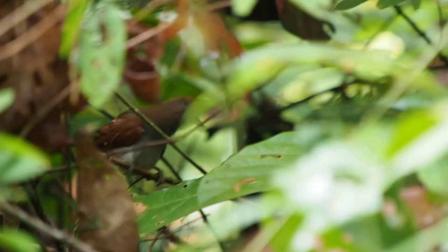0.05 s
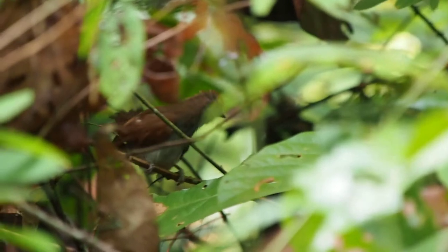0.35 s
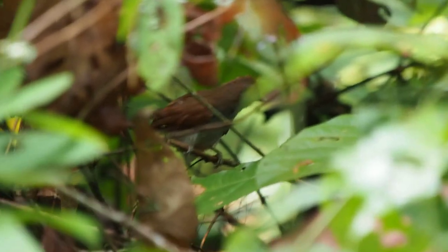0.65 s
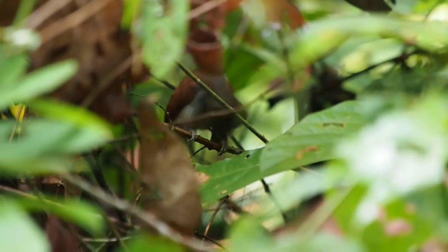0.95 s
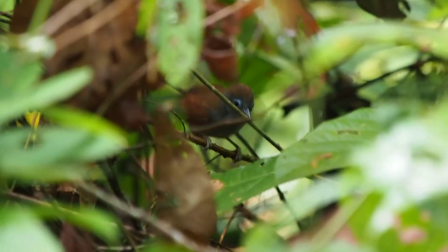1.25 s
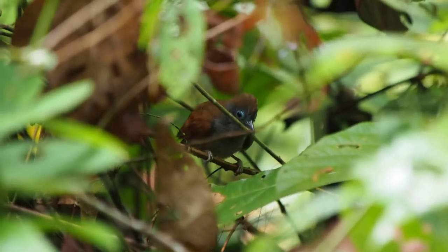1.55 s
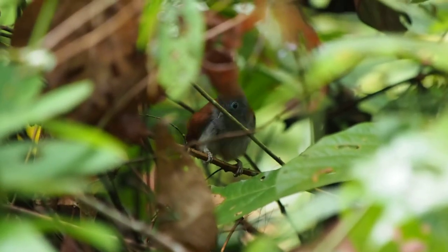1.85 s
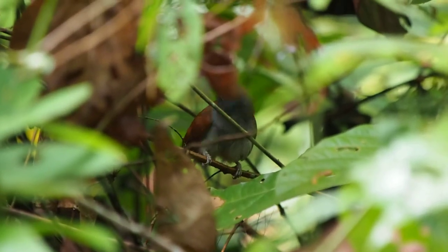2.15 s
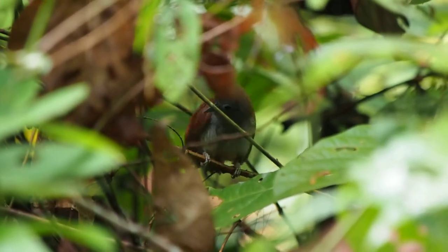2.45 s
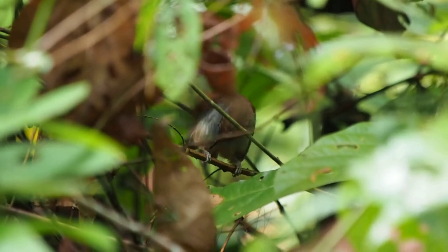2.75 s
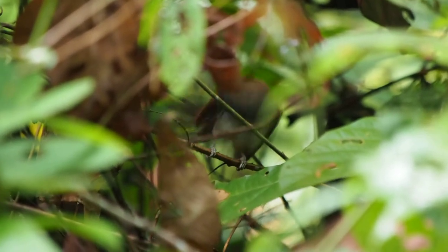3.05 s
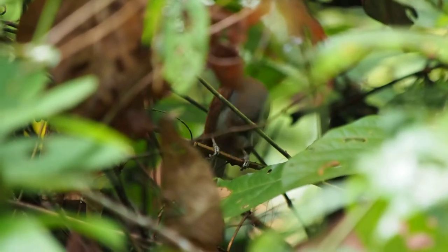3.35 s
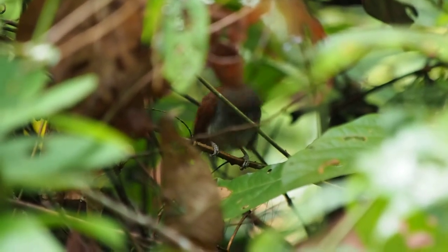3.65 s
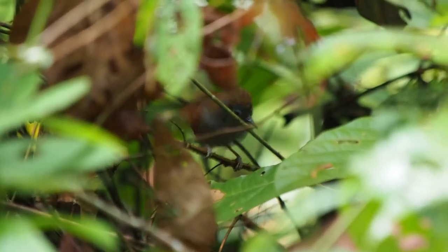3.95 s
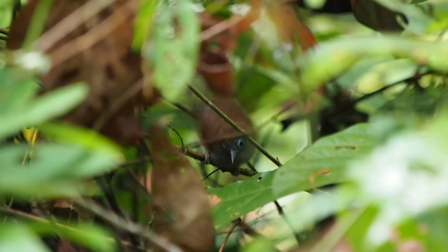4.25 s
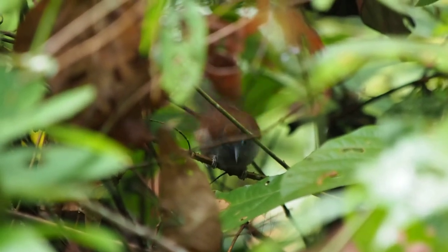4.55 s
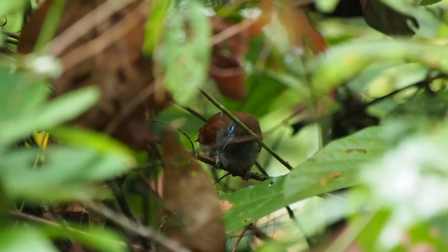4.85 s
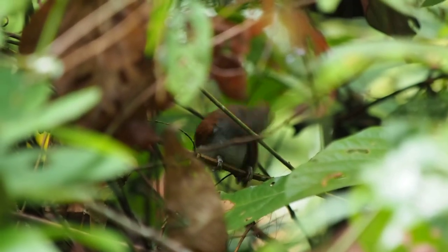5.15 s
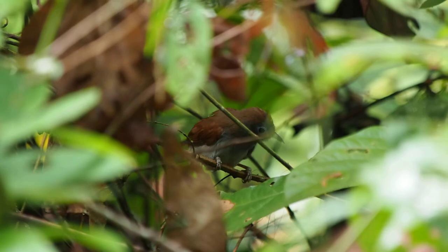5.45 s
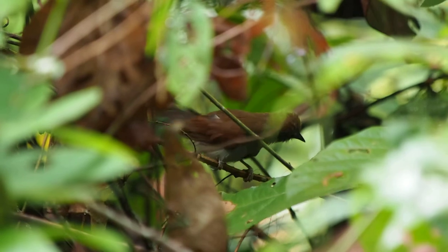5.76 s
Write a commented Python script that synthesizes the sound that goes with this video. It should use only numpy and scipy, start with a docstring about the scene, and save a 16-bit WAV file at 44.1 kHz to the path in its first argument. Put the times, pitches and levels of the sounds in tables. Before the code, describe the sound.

A loud, pulsing cicada drone fills the forest, with high cricket trills and a small bird's brief, rapid series of soft hoots.

```python
"""In a forest, microphone among trunks and leaves that scatter every sound. From the start a near cicada
throbs, clicking its tymbals and heaving its abdomen, while neighbours hold steady tones; crickets and
bush-crickets shrill with their wings, and an engine hums far off. About a second in, a bird gives a quick
run of soft hoots. Before it ends, the near cicada holds one note, then throbs on from about 3 s.
Late on, a small cricket chirps, and a last, distant cicada joins."""
import sys
import numpy as np
from scipy import signal
from scipy.fft import rfft, irfft, next_fast_len
from scipy.io import wavfile
from scipy.ndimage import uniform_filter1d, map_coordinates

SR = 44100
rng = np.random.default_rng(int(sys.argv[2]) if len(sys.argv) > 2 else 0)


def materialize(psi):
    """Save the field psi as 16-bit PCM at rate SR to the path in sys.argv[1].

    A 1-D psi becomes a single channel; in a 2-D psi each row is a channel.
    """
    bounded = np.clip(np.atleast_2d(psi).T, -1, 1)
    quanta = np.round(bounded * 32767).astype(np.int16)
    wavfile.write(sys.argv[1], SR, quanta)


N = 260631
T = np.arange(N) / SR
HOLD_START_S, HOLD_END_S = 1.68, 2.915  # the near cicada's held note
ROAR_LULL_DB = -61.5

# likeness of the noise at the microphone's left and right: f/Hz, correlation
STEREO_LIKENESS = [(60, 0.59), (130, 1), (290, 0.79), (640, 0.84), (1410, 0.66), (3100, 0.038),
                   (6820, 0.025), (15000, 0.024)]
# noise spectra of the background: f/Hz, relative level/dB
RUMBLE_SPECTRUM = [(20, -14), (55, -42), (85, -5), (110, -6.5), (150, 8.5), (195, 2), (230, -4), (320, 1.5),
                   (380, -8.5), (460, 3), (560, -40), (900, -24)]
ROAR_SPECTRUM = [(400, -56), (540, -4.5), (600, -2), (640, -5), (680, -9.5), (725, 0.5), (785, 0.5),
                 (830, -6), (950, -3), (1100, -9), (1300, -22.5), (2000, -24.5), (3200, -21), (5000, -62)]
LEAF_SPECTRUM = [(1100, -29), (1450, -5), (1660, 2), (1950, -8.5), (2250, -8), (3200, -7.5), (4500, -64)]
AIR_SPECTRUM = [(30, -2), (600, 5), (1300, 0), (2300, 1.5), (3300, 0.5), (3800, 3), (5400, 1), (6100, -3),
                (10500, -13), (11700, -9.5), (12400, -5), (13300, -10), (14300, 0), (15000, -3),
                (15700, -43)]
# swells of the distant rush: t/s at full strength, hold/s, level/dB over the lull
RUSH_SWELLS = [(0, 0.39, 6.5), (.95, 0.2, 8), (2.67, 0.48, 9), (3.55, 0.073, 6), (4.35, 0.023, 3.5),
               (4.85, 0.13, 5.5), (5.5, .4, 7.5)]
# engine hum: t/s, level/dB
ENGINE_LEVEL = [(0, -54.5), (1.35, -53), (2.1, -55), (4, -55), (5.91, -61)]
# engine firing rate: t/s, f/Hz
FIRING_RATE = [(0, 136), (2, 134.3), (4, 132.7), (5.91, 131.6)]
# engine lines in the hum and in the roar: multiple of the firing rate, relative level/dB
HUM_LINES = [(1, 1), (1.5, -15), (2, -7.5), (2.5, -11.5), (3, -14.5), (3.5, -24.5)]
ROAR_LINES = [(4.5, -9.5), (5, -15), (5.5, -9)]
# far-off notes: middle t/s, length/s, f/Hz, level/dB
DISTANT_NOTES = [(2.725, .08, 1696, -57.5), (2.835, 0.06, 880, -58), (3.08, .24, 730, -55.5),
                 (3.54, 0.2, 590, -57), (4.8, .09, 3700, -63.5), (5.35, .09, 3710, -61),
                 (5.7, .06, 3810, -63)]
# noise spectra of far insects and a rasping bush-cricket: f/Hz, relative level/dB
FAR_INSECT_SPECTRUM = [(5800, -73), (6400, -14), (6800, -15), (7050, -3.5), (7280, 0.5), (7550, -3.5),
                       (7850, -10.5), (8150, -11.5), (8450, -7.5), (8800, -5.5), (9400, -18), (10000, -15),
                       (10400, -29), (11000, -38)]
BUSH_CRICKET_SPECTRUM = [(9300, -44), (10200, -11), (10600, 0), (11100, -1.5), (11600, -18), (12500, -30)]
# cricket trills: start t/s, end t/s
CRICKET_TRILLS = [(.45, 0.95), (1.49, 2.1), (2.63, 2.96), (3.65, 4.09), (4.7, 5)]
# thin, high tones, with a faint, very high one about a second in: start t/s, end t/s, f/Hz, level/dB
THIN_TONES = [(0, .52, 9035, -58.5), (.52, 1.33, 9030, -64), (.1, .9, 8382, -65), (.87, 1.27, 12030, -67.5),
              (2.19, 2.8, 8760, -58.5), (3.2, 3.53, 8834, -53.5), (4.47, 4.61, 8785, -54.5),
              (5.5, 5.88, 8840, -59)]
# lines of the steady cicada notes: multiple of the tymbal rate, relative level/dB
FIRST_LINES = [(31, -56.3), (33, -57.6), (34, -46.9), (35, -39.5), (37, -51.2), (38, -45.8), (39, -49.4),
               (41, -63.9), (43, -67.9)]
SECOND_LINES = [(30, -62.0), (33, -58.3), (34, -45.5), (37, -56.5), (38, -52.7), (40, -64.5)]
HELD_LINES = [(29, -68), (30, -61), (31, -50.5), (32, -53), (33, -48.5), (34, -39), (35, -43.2),
              (36, -44.5), (37, -41), (38, -39), (39, -48), (40, -55), (41, -52.5), (42, -67), (43, -65),
              (44, -68)]
# near cicada's rasp as it changes song, and its tymbals' dry scrape: f/Hz, relative level/dB
SONG_CHANGE_SPECTRUM = [(2400, -42), (3400, -22), (3850, -15), (4080, -3), (4220, 2), (4300, -3),
                        (4420, -22), (5500, -70)]
SCRAPE_SPECTRUM = [(3300, -35), (3750, -9), (4100, -9), (4350, -4), (4600, 3), (4920, 0), (5170, -5),
                   (5450, -22), (5800, -50)]
# lines of the throbbing song: multiple of the click rate, relative level/dB
THROB_LINES = [(14, -33), (15, -38), (16, -11), (17, -18), (18, 0), (19, -18.5), (20, -14), (21, -37),
               (22, -40)]
# heaves of the near cicada's abdomen: t/s, f/Hz
THROB_RATE = [(0, 19), (1.2, 19.5), (1.6, 23.7), (1.75, 24.5), (2.9, 26), (3.3, 24.5), (3.8, 24.2),
              (4.2, 23), (4.9, 23.3), (5.4, 21.3), (5.91, 21.3)]
# brief surges of the throbbing chorus: t/s, extra level/dB
THROB_SURGES = [(1.599, 0), (1.93, 3), (3.43, 1.5), (5.25, 0)]


def amp(db):
    """Decibels to gain."""
    return 10 ** (np.asarray(db) / 20)


def unit(x):
    """Scaled to rms 1."""
    return x / np.sqrt(np.mean(x ** 2) + 1e-20)


def even(x):
    """Each channel held at rms 1 over a quarter second."""
    return x / np.sqrt(np.abs(uniform_filter1d(x ** 2, size=SR // 4)) + 1e-12)


def along(points, hz):
    """(f/Hz, value) points read on a log axis."""
    f, values = np.transpose(points)
    return np.interp(np.log(hz + 1), np.log(f + 1), values)


def curve(points):
    """(t/s, value) points read at every sample."""
    return np.interp(T, *np.transpose(points))


def wobble(rate):
    """A smooth random curve, rate knots a second."""
    return map_coordinates(rng.standard_normal(int(N * rate / SR) + 4), [T * rate], mode="nearest")


def turns(hz):
    """Running phase in radians of a changing frequency."""
    return 2 * np.pi * np.cumsum(hz) / SR


def gate(start, end, edge):
    """Opens at start and closes at end, with soft edges."""
    return np.clip((T - start) / edge + .5, 0, 1) * np.clip((end - T) / edge + .5, 0, 1)


def phrase(start, end, attack, release):
    """Rises from start over the attack, holds, and dies away over the release to end."""
    return np.clip((T - start) / attack, 0, 1) * np.clip((end - T) / release, 0, 1)


def filtered(x, response):
    """x times a response of frequency."""
    size = next_fast_len(N + SR // 4)
    return irfft(rfft(x, size) * response(np.fft.rfftfreq(size, 1 / SR)), size)[..., :N]


def panned(x, left_db):
    """Louder on the microphone's left by left_db."""
    return x * amp([[left_db / 2], [-left_db / 2]])


def noise(spectrum):
    """Stereo noise of rms 1, alike in the bass and unrelated in the treble."""
    def response(hz):
        angle = np.arccos(np.clip(along(STEREO_LIKENESS, hz), -1, 1)) / 2
        return amp(along(spectrum, hz)) * [np.cos(angle), np.sin(angle)]
    mid, side = filtered(rng.standard_normal((2, N)), response)
    return unit(np.array([mid + side, mid - side]))


def forest(x, wet_db, t60):
    """Direct sound plus echoes off trunks and leaves, different on each side of the microphone."""
    t = np.arange(SR // 2) / SR
    tail = rng.standard_normal((2, len(t))) * amp(-60 * t / t60)
    echoes = signal.fftconvolve(np.atleast_2d(x), tail, axes=1)[:, :N]
    echoes *= np.std(x) / np.std(echoes, axis=1, keepdims=True)
    return (x + amp(wet_db) * echoes) / np.hypot(1, amp(wet_db))


def swell_db(attack=.35, release=.59):
    """How far the distant rush stands above its lull."""
    return np.max([db * phrase(s - attack, s + hold + release, attack, release)
                   for s, hold, db in RUSH_SWELLS], axis=0)


def distant_rush(air_db=-55.5, leaves_db=-60, settle_db_per_s=1.43):
    """Far rumble, hollow roar and stirring leaves swell together over the even hiss of the air."""
    swell = swell_db()
    rumble_db = curve(ENGINE_LEVEL) - 4.5 + .32 * swell  # fades with the engine
    rumble = amp(rumble_db + 1.1 * wobble(6.1)) * noise(RUMBLE_SPECTRUM)
    roar = amp(ROAR_LULL_DB + swell + .6 * wobble(8)) * noise(ROAR_SPECTRUM)
    rustle_db = leaves_db + .48 * swell - settle_db_per_s * T
    leaves = amp(rustle_db + .74 * wobble(8.2)) * noise(LEAF_SPECTRUM)
    return panned(rumble + roar, .92) + leaves + amp(air_db) * noise(AIR_SPECTRUM)


def engine(half_rate_db=-78, growth_db_per_hz=2.5):
    """A far engine slows and its half-rate throb grows; overtones fade in and out through the trees."""
    firing_hz, hum_db = curve(FIRING_RATE), curve(ENGINE_LEVEL)
    roar_db = ROAR_LULL_DB + swell_db() + hum_db - np.mean(hum_db)
    phase = turns(firing_hz * (1 + .001896 * wobble(8)))

    def line(k, db, blur):
        return np.sqrt(2) * amp(db) * np.sin(k * phase + blur * wobble(25) + rng.uniform(0, 2 * np.pi))
    throb = line(.5, half_rate_db + growth_db_per_hz * (firing_hz[0] - firing_hz), blur=.63)
    hum = sum(line(k, hum_db + db + 2 * min(k - 1, 1) * wobble(4.1), blur=.21) for k, db in HUM_LINES)
    roar = sum(line(k, roar_db + db + 2 * wobble(7.3), blur=.88) for k, db in ROAR_LINES)
    return panned(throb + hum + roar, .77)


def far_notes(waver=.015):
    """Faint pitched notes and chirps carry from far off, blurred by the trees."""
    notes = np.zeros(N)
    for s, length, hz, db in DISTANT_NOTES:
        swell = np.cos(np.pi / 2 * np.clip(2 * (T - s) / length, -1, 1) ** 2)
        notes += amp(db) * swell * np.sqrt(2) * np.sin(turns(hz * (1 + waver * wobble(150))))
    return forest(notes, wet_db=0, t60=.45)


def far_insects(db=-46.5):
    """Many distant insects merge into a shimmering hiss, a little to the right."""
    shimmer_db = .55 * wobble(5.2) + .49 * wobble(150)
    return panned(amp(db + shimmer_db) * noise(FAR_INSECT_SPECTRUM), -2)


def rasping_bush_cricket(period_s=.724, onset_s=.44, attack=.33, release=.13, db=-61):
    """A bush-cricket's soft rasp swells after each short pause."""
    age = (T - onset_s) % period_s
    swell = np.clip(age / attack, 0, 1) * np.clip((period_s - age) / release - .3, 0, 1)
    return amp(db) * swell * noise(BUSH_CRICKET_SPECTRUM)


def ticking_bush_cricket(rate_hz=20.3, gap_s=.0096, width_s=.0022, centre_hz=14450, fall_hz=260, db=-66):
    """Wing strokes come in threes of growing strength, each a brief falling tick."""
    age = (T * rate_hz + .3 + .03 * wobble(3.3)) % 1 / rate_hz
    ticks = np.zeros(N)
    for k, stroke_db in enumerate([-7, -1, 0]):
        from_peak = (age - (k + .5) * gap_s) / width_s
        pitch = centre_hz - fall_hz * np.clip(from_peak, -2, 2) + 150 * wobble(1500)
        ticks += amp(stroke_db) * np.exp(-from_peak ** 2 / 2) * np.sin(turns(pitch))
    return amp(db) * forest(unit(ticks * amp(1.5 * wobble(40))), wet_db=-4, t60=.15)


def chirping_cricket(start_s=4.65, chirps_per_s=14, pitch_hz=10080, db=-67):
    """A small cricket joins late with light, very high chirps."""
    chirps = np.sin(np.pi * chirps_per_s * T + .1 * wobble(4)) ** 4
    tone = np.sin(turns(pitch_hz + 30 * wobble(300)))
    fade_in = np.clip((T - start_s) / .2, 0, 1)
    return amp(db) * fade_in * forest(unit(chirps * tone), wet_db=0, t60=.08)


def trills_and_thin_tones(trill_db=-56, trill_hz=9225, strokes_per_s=34.2, fall_hz=50, pulse_db=6):
    """Off to the right, a cricket trills with quick wing strokes, and thin, high tones come and go."""
    stroke = 2 * np.pi * strokes_per_s * T + .2 * wobble(5.9)
    trill_pitch = trill_hz - fall_hz * np.sin(stroke) + 25 * wobble(200)
    trill = np.sin(turns(trill_pitch)) * amp(pulse_db * np.cos(stroke))
    bouts = sum(gate(start, end, edge=.051) for start, end in CRICKET_TRILLS)
    tones = np.zeros(N)
    for start, end, hz, db in THIN_TONES:
        pitch = hz + 14 * wobble(4.4) + 14 * wobble(90)  # slow drift, fast flutter
        gain = amp(db + 1.7 * wobble(14)) * gate(start, end, edge=.1)
        tones += gain * np.sqrt(2) * np.sin(turns(pitch))
    trills = amp(trill_db) * bouts * even(forest(trill, wet_db=2, t60=.17))
    return panned(trills + forest(tones, wet_db=9, t60=.11), -5.5)


def hoot_run(count=20, start_s=.892, gap_s=.0673, pitch_hz=951, db=-36):
    """Hoots as t/s, f/Hz, level/dB: soft and slow at first, sinking and slowing as the bird tires."""
    k = np.arange(count)
    timid, tired = np.exp(-k / 2.2), (k / (count - 1)) ** 4
    gaps = gap_s + .0115 * timid + .0078 * tired
    bend_hz = 33 * (k == 1) - 52 * tired - 28 * (k == count - 1)  # second overshoots, last drops
    pitches = pitch_hz + bend_hz + 3 * rng.standard_normal(count)
    levels = db - 9 * timid - 6.5 * tired ** 3 + .43 * rng.standard_normal(count)
    return np.transpose([start_s + np.cumsum(gaps) - gaps, pitches, levels])


def bird(length_s=.047, arch=.037, slur=.02, waver=.014, shorter_per_db=.012):
    """Straight ahead, nearly pure hoots, each arching up in pitch and back; soft ones are briefer."""
    song = np.zeros(N)
    hoots = hoot_run()
    loudest = max(db for s, hz, db in hoots)
    for s, hz, db in hoots:
        samples = int(length_s * (1 - shorter_per_db * (loudest - db)) * SR)
        u = np.linspace(-1, 1, samples)  # position within the hoot
        quaver = waver * np.sin(2 * np.pi * u + rng.uniform(0, 2 * np.pi))
        pitch = hz * (1 + arch * (.15 - u ** 2) + slur * u + quaver)
        swell = np.cos(np.pi / 2 * np.abs(u) ** 1.5) ** 2
        start = round(s * SR) - samples // 2
        song[start:start + samples] += amp(db) * swell * np.sin(turns(pitch))
    return panned(forest(song, wet_db=-13.5, t60=.55), -.19)


def steady_cicada(effort, lines, rate_hz, spread, jitter, fray):
    """Evenly beating tymbals give a comb of clean lines, which fray as the insect starts and stops."""
    falter = np.sqrt(np.clip(1 - effort, 0, 1))
    phase = turns(rate_hz * (1 + jitter * wobble(39.92) + fray * falter * wobble(150)))
    note = np.zeros((2, N))
    for k, db in lines:
        # each line reaches left and right out of step; higher lines sound wider
        phase_gap = spread * (k / 35) ** 4
        offsets = rng.uniform(0, 2 * np.pi) + phase_gap * rng.choice([-1, 1]) * np.array([[.5], [-.5]])
        note += amp(db + 1.1 * wobble(4) + .6 * wobble(25)) * np.cos(k * phase + offsets)
    return np.sqrt(2) * effort * note


def neighbour_cicadas(first_gain_db=3, sag_db_per_s=6, second_gain_db=2.5, late_gain_db=-14):
    """One starts at once and fades, one builds slowly and stops short, a far one joins at the end."""
    first_effort = phrase(0, 6.1, attack=.16, release=.19)
    second_effort = phrase(.24, 1.68, attack=.7, release=.21)
    late_effort = np.clip((T - 5.56) / .052, 0, 1)
    first = steady_cicada(first_effort, FIRST_LINES, rate_hz=133.03, spread=1.9, jitter=.0008, fray=.003)
    second = steady_cicada(second_effort, SECOND_LINES, rate_hz=133.68,
                           spread=1.3, jitter=.0008, fray=.003)
    late = steady_cicada(late_effort, HELD_LINES, rate_hz=131.9, spread=1.5, jitter=.001, fray=.005)
    first *= amp(first_gain_db - sag_db_per_s * T)
    return panned(first + amp(second_gain_db) * second + amp(late_gain_db) * late, -.58)


def held_note(gain_db=1.5, ends_softer_db=2, rasp_db=-49):
    """The near cicada slides into its steady note through a low rasp; the note is fullest midway."""
    effort = phrase(HOLD_START_S - .04, HOLD_END_S + .09, attack=.06, release=.17)
    note = steady_cicada(effort, HELD_LINES, rate_hz=131.44, spread=1.5, jitter=.0005, fray=.012)
    from_middle = (2 * T - HOLD_START_S - HOLD_END_S) / (HOLD_END_S - HOLD_START_S)
    note *= amp(gain_db - ends_softer_db * from_middle ** 2)
    rasp_swell = phrase(HOLD_START_S - .2, HOLD_START_S + .71, attack=.13, release=.67)
    return panned(note, 1) + amp(rasp_db) * rasp_swell * noise(SONG_CHANGE_SPECTRUM)


def throbbing_cicada(beat, depth_db, click_hz, rise, jitter, rough_db, tilt_db, odd_db, low_db):
    """Two tymbals click in turn, gliding down on each heave; between heaves they weaken and speed up."""
    slack = ((1 - np.cos(beat)) / 2) ** 2
    glide = (1 - np.sin(beat + .7)) / 2 * (1 + .1 * wobble(20))
    unsteady = wobble(70) / 2 + wobble(14)
    phase = turns(click_hz * (1 + rise * glide + jitter * unsteady))
    song = np.zeros(N)
    for k, db in THROB_LINES:
        colour_db = tilt_db * k + odd_db * (k % 2) + low_db * (k == 16)  # 16: the lower resonance
        song += amp(db + colour_db) * np.cos(k * phase + rng.uniform(0, 2 * np.pi))
    dip_db = depth_db * (1 + .25 * wobble(20))
    return song * amp(rough_db * wobble(60) - dip_db * slack)


def throbbing_chorus(near_db=-35.5, grows_db_per_s=.4447, far_db=-44, far_throb_hz=23, scrape_db=-57):
    """The near cicada throbs ever louder and deeper, bar its held note; a far one swells and ebbs."""
    near_beat = turns(curve(THROB_RATE))
    near_beat += .25 * wobble(10) - np.interp(5.59, T, near_beat)  # a full heave falls near 5.59 s
    far_beat = turns(np.full(N, far_throb_hz)) + wobble(6)
    regain_s = .32  # the throb takes a moment to return
    holding = phrase(HOLD_START_S, HOLD_END_S + regain_s, attack=.1, release=regain_s)
    depth_db = (6 + 1.2 * T) * (1 - holding)
    low_swell_db = 9 * phrase(HOLD_START_S - .27, HOLD_START_S + .27, attack=.13, release=.23)
    near_rise = np.where(T < HOLD_START_S, .014, .023)
    near = throbbing_cicada(near_beat, depth_db, click_hz=262.2, rise=near_rise, jitter=.0006,
                            rough_db=1, tilt_db=0, odd_db=-2, low_db=low_swell_db)
    # mostly echoes reach the microphone, breaking the glides into a different flutter on each side
    near = even(forest(near, wet_db=9, t60=.21))
    far = throbbing_cicada(far_beat, depth_db=3, click_hz=265.6, rise=.013, jitter=.002,
                           rough_db=1.5, tilt_db=.3, odd_db=3, low_db=1)
    far = even(forest(far, wet_db=12, t60=.3))
    lull = phrase(HOLD_START_S - .04, HOLD_END_S + regain_s, attack=.1, release=.63)
    near *= amp(near_db + grows_db_per_s * T) * (1 - .9 * lull)
    far *= amp(far_db + 6 * np.exp(-((T - 2.3) / 2) ** 2))
    scrape = amp(scrape_db + depth_db * np.cos(near_beat) / 4) * noise(SCRAPE_SPECTRUM)
    surge = amp(sum(db * np.exp(-((T - s) / .14) ** 2) for s, db in THROB_SURGES))
    return panned(surge * (near + far + scrape), -1.84)


def scene():
    """The forest from one spot: cicadas in front, shrill insects above, the engine far behind."""
    shrill = trills_and_thin_tones() + chirping_cricket() + ticking_bush_cricket()
    shrill += rasping_bush_cricket() + far_insects()
    cicadas = throbbing_chorus() + held_note() + neighbour_cicadas()
    return cicadas + shrill + bird() + far_notes() + engine() + distant_rush()


def record(dry, top_hz=15750):
    """The microphone keeps nothing above its band limit."""
    return filtered(dry, lambda hz: hz < top_hz)


dry = scene()
out = record(dry)
materialize(out)
```